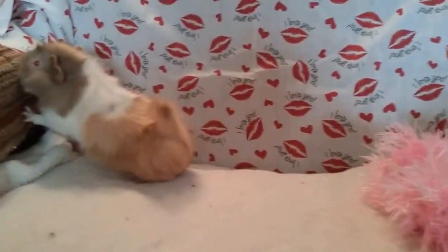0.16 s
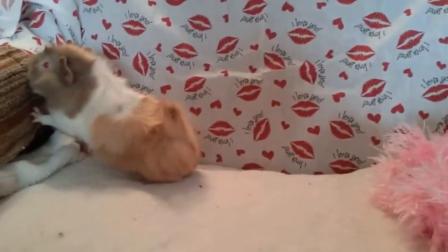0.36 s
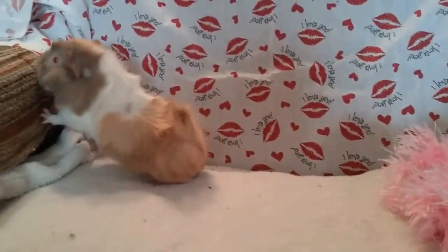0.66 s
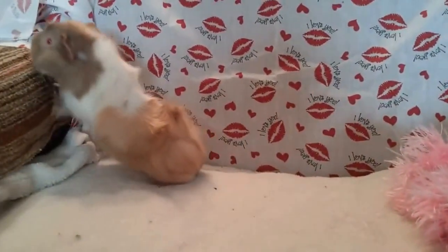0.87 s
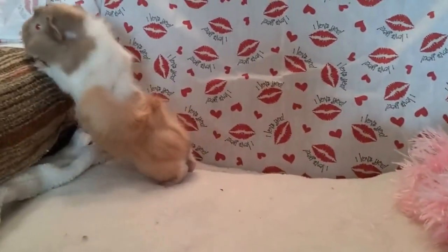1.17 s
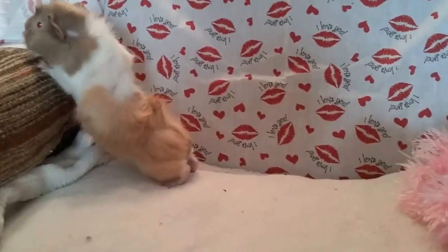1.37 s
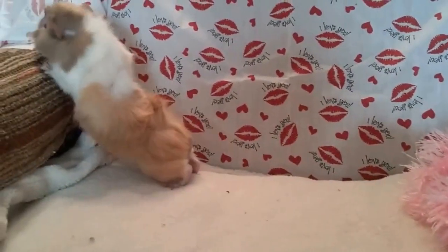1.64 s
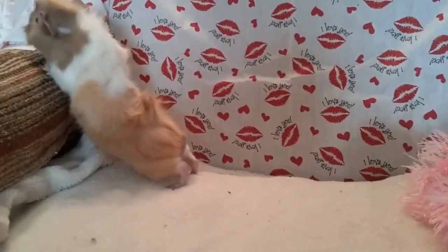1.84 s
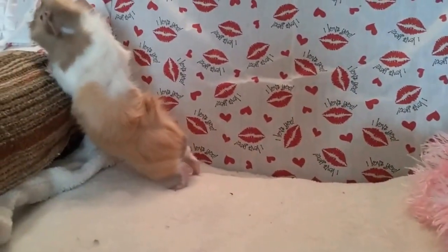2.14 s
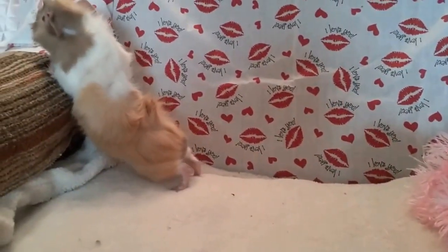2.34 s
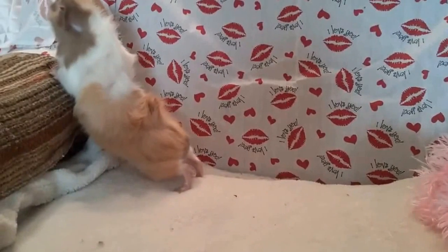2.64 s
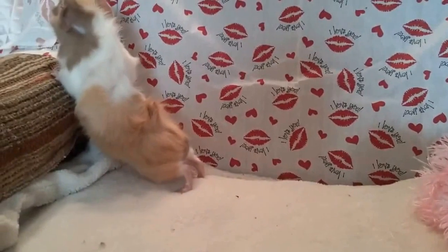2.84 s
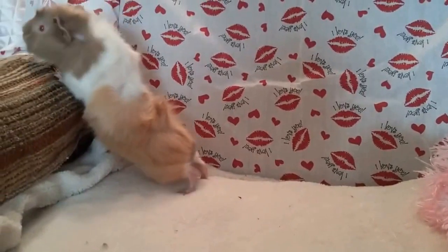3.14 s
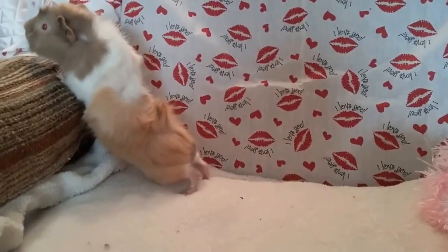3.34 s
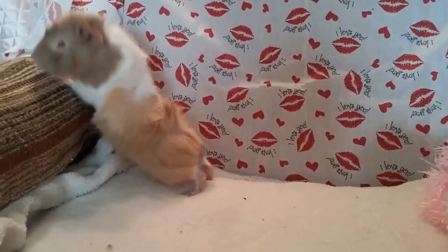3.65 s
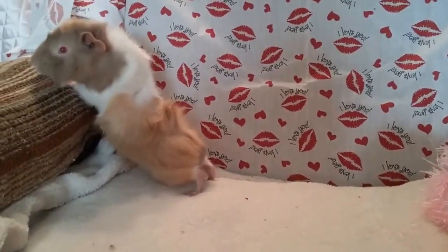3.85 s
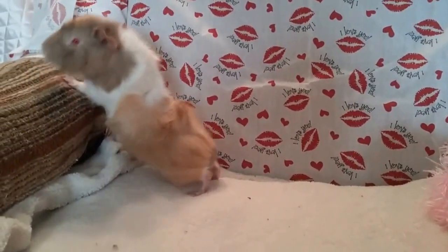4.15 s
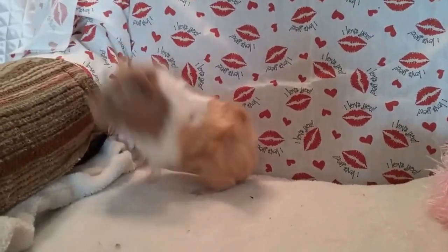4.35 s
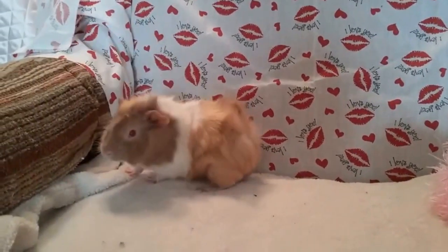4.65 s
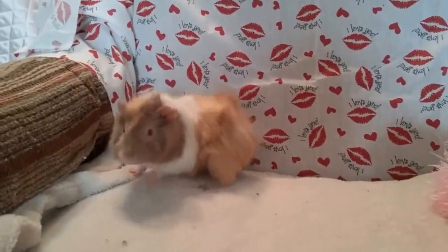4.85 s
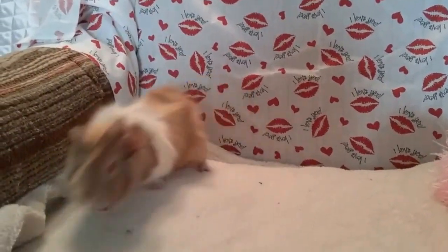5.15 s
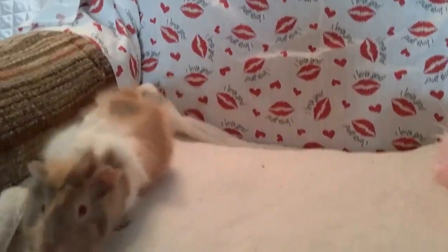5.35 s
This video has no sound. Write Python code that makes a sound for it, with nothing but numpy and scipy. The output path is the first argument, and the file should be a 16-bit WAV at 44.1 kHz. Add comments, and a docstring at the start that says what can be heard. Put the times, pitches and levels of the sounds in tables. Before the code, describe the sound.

Close to the microphone in a small room, a guinea pig calls about three times a second, its quiet, husky grunts often sliding up into loud, high whistles. A young goat, slightly farther off, bleats over it with a throaty quaver: one short call, two longer loud ones, then a faint one. Near the end the guinea pig thumps softly onto a blanket and keeps squealing. A few claw ticks and a low hum lie underneath.

```python
"""A small room, a guinea pig begging up close: husky grunts that glide up into whistles.
Every call follows one S-shaped climb in pitch; the short ones stop before the whistle.
A young goat bleats over it, a throaty buzz quavering at about ten beats a second.
The guinea pig drops onto its blanket and patters off with soft thumps.
A few ticks of claws and teeth, room air and a low hum lie underneath."""
import sys
import numpy as np
from scipy import signal
from scipy.fft import rfft, irfft
from scipy.io import wavfile
from scipy.ndimage import uniform_filter1d

SR = 44100
rng = np.random.default_rng(int(sys.argv[2]) if len(sys.argv) > 2 else 0)


def inscribe(sig):
    """Save sig as 16-bit PCM at rate SR to the path in sys.argv[1].

    A 1-D sig is mono; a 2-D sig holds one channel per row.
    Samples are clipped to [-1, 1] before scaling.
    """
    pcm = np.round(np.clip(np.atleast_2d(sig).T, -1, 1) * 32767)
    wavfile.write(sys.argv[1], SR, pcm.astype(np.int16))


N = 242991
T = np.arange(N) / SR
TOP_HZ = 15900

# colour of the guinea pig's hiss and rasp: f/Hz, gain/dB
BREATH_COLOUR = [(1200, -33.5), (2200, -2), (3300, -13.5), (4200, -13.5), (6200, 3.5), (8000, -7),
                 (11500, -9), (14000, -12), (16000, -53.5)]


def undb(db):
    """Decibels to gain."""
    return 10 ** (np.asarray(db) / 20)


def unit(x):
    """Scale to rms 1."""
    return x / np.sqrt(np.mean(x ** 2))


def walk(rate, size):
    """Random wander of rms 1, with `rate` turns a second."""
    return unit(np.interp(np.arange(size) * rate / SR, np.arange(size), rng.standard_normal(size)))


def gain_at(points, hz):
    """Gain of an EQ curve (f/Hz, gain/dB) at given frequencies."""
    f, db = np.transpose(points)
    return undb(np.interp(np.log(hz + 1), np.log(f), db))


def coloured(points):
    """Noise of rms 1 shaped by an EQ curve."""
    return unit(irfft(rfft(rng.standard_normal(N)) * gain_at(points, np.fft.rfftfreq(N, 1 / SR)), N))


def band(hz, width_hz):
    """Noise of rms 1 in one damped resonance with steep skirts."""
    f = np.fft.rfftfreq(N, 1 / SR) + 1
    return unit(irfft(rfft(rng.standard_normal(N)) / (1 + ((f - hz ** 2 / f) / width_hz) ** 2), N))


def swell(centre, length):
    """A smooth bump of an envelope."""
    return np.cos(np.pi * np.clip((T - centre) / length, -.5, .5)) ** 2


def partials(hz, throat, count):
    """Phases and throat gains of the harmonics of a moving pitch, one row each."""
    k = np.arange(1, count + 1)[:, None]
    return k * 2 * np.pi * np.cumsum(hz) / SR, gain_at(throat, k * hz) * (k * hz < TOP_HZ)


def call_shape(start, middle, end, held, grunt_hz, whistle_hz, glide,
               grunt_db, whistle_db, grunt_over_db, whistle_over_db):
    """Span, pitch, level and overtone level of a call, all riding one S-shaped climb."""
    # the voice thins where grunt breaks into whistle: climb/0-1, level/dB, overtones/dB
    thinning = [(0, -9, 1.5), (.22, 1, 0), (.6, -4.5, -2.5), (.85, -3.5, -5.5), (1, -2.5, -2.5)]
    creep_octaves_per_s, flick_share, flick_s = 1.6, .2, .017
    early_share, catch_s = .4216, .0054
    release_db, release_s = -11, .013885
    on = (T > start) & (T < end)
    t = T[on]
    climb = 1 / (1 + np.exp((middle - t) / glide))
    high = climb ** 6
    top_hz = whistle_hz * 2 ** (creep_octaves_per_s * (t - end))
    flick = flick_share * high * np.clip(2 * (1 - (end - t) / flick_s), 0, 1)  # whistles end upward
    hz = grunt_hz * (top_hz / grunt_hz) ** climb * (1 + flick + .008 * walk(45, N)[on])
    # the whistle swells partway during the climb, then catches all at once
    caught = 1 / (1 + np.exp((end - held - t) / catch_s))
    whistle = early_share * high + (1 - early_share) * caught * climb
    release = np.clip(1 - (end - t) / release_s, 0, 1)
    share, thin_db, thin_over_db = np.transpose(thinning)
    db = grunt_db + (whistle_db - grunt_db) * whistle
    db += np.interp(climb, share, thin_db) + release_db * release
    broken = np.clip((climb - .2663) / .65, 0, 1)  # crossfade from grunt colour to whistle colour
    over_db = grunt_over_db + (whistle_over_db - grunt_over_db) * broken
    over_db += np.interp(climb, share, thin_over_db)
    return on, hz, db, over_db


def wheek(call, grunt_jitter=.0564, whistle_jitter=.00911, slack_hz=720, open_hz=2150, flutter=.5407,
          shimmer_db=2.7332, husk_db=-6, air_db=-28, push_db=2.5, push_s=.032, fade_s=.0063):
    """One call: an uneven grunt that steadies and opens as it climbs into a whistle."""
    # throat EQ, mouth open for the whistle and closed for the grunt: f/Hz, gain/dB
    open_throat = [(1700, 10.5), (2400, 2.5), (3200, -47.5), (4400, -21.5), (5800, 3), (7000, -16),
                   (9000, -22), (12000, -20.5), (14500, 3), (16000, -7.5)]
    closed_throat = [(250, -24), (500, -4), (900, 1), (1700, 0), (2400, -4), (3100, -18), (4300, -20),
                     (5800, -34), (9000, -36), (15000, -46)]
    on, hz, db, over_db = call_shape(*call)
    t = T[on]
    db = db + push_db * np.exp((t[0] - t) / push_s)  # each call starts with a push
    slack = 1 / (1 + (hz / slack_hz) ** 4)  # slack folds beat unevenly
    closed = 1 / (1 + (hz / open_hz) ** 4)
    hz = hz * (1 + (whistle_jitter + grunt_jitter * slack) * walk(600, len(t)))
    phase, open_gain = partials(hz, open_throat, count=9)
    _, closed_gain = partials(hz, closed_throat, count=9)
    gain = closed_gain ** closed * open_gain ** (1 - closed)
    # overtones weaken with their order and come and go one by one
    upper = np.array([g / k ** .7 * undb(3.5 * walk(70, len(t))) for k, g in enumerate(gain[1:], 2)])
    overtones = (upper * np.sin(phase[1:])).sum(0) / np.sqrt((upper ** 2).sum(0))
    tone = np.sqrt(2) * (np.sin(phase[0]) + undb(over_db) * overtones)
    tone *= 1 + flutter * slack * walk(500, len(t))
    leak = 1 + np.cos(phase[0])  # air escapes once a cycle
    husk = undb(husk_db) * np.sqrt(slack) * leak * coloured(closed_throat)[on]
    air = undb(air_db + over_db) * coloured(BREATH_COLOUR)[on]  # a pressed call hisses
    edges = np.clip(np.minimum(t - t[0], t[-1] - t) / fade_s, 0, 1)
    shimmer = shimmer_db * (1 - slack) * walk(200.7, len(t))
    out = np.zeros(N)
    out[on] = (tone + husk + air) * edges * undb(db + shimmer)
    return out


def guinea_pig():
    """A string of begging calls, with a rasp where a whistle cracks."""
    # calls: start/s, mid-climb/s, end/s, whistle hold/s, grunt f/Hz, whistle f/Hz, glide/s,
    # grunt level/dB, whistle level/dB, grunt overtones/dB, whistle overtones/dB
    calls = [(-.2, -0.101, .012, 0.0497, 550.8, 2635, 0.0347, -23, -24, 0, -15),
             (0.106, 0.231, .238, 0.0156, 506, 2416, 0.028363, -45.5, -55, -3.5, 11),
             (0.434, 0.552, .555, 0, 487, 2504, 0.02767, -44.5, -47, -2, 0),
             (0.753, .879, .995, 0.0018, 487.3, 3173, 0.033, -42, -31.5, -3, -17),
             (1.103, 1.241, 1.254, 0.05686, 522.3, 2516, 0.0409, -43.5, -56, -4.5, 3),
             (1.398, 1.498, 1.498, 0, 521, 2579, 0.02207, -46.5, -56.5, -4.5, -26),
             (1.63, 1.761, 1.922, 0.0793, 531.6, 2990, .028, -46.5, -21.5, -1.5, -8),
             (2.03, 2.109, 2.255, 0.1334, 466.6, 2590, 0.015799, -39, -26.5, 3, -8.5),
             (2.36, 2.461, 2.485, 0.0076, 508.2, 2581, 0.02286, -42.5, -50.5, 0.5, 8.5),
             (2.577, 2.676, 2.85, 0.10378, 527.5, 3135, .025, -40.5, -16, 5, -3),
             (2.96, 3.066, 3.203, 0.09395, 516.9, 2941, 0.032206, -41, -25, 3, -2),
             (3.31, 3.445, 3.465, 0, 489.3, 2465, 0.04215, -44, -63.5, 6, 3),
             (3.658, 3.759, 3.785, 0.0257, 494, 2428, 0.03, -44.5, -47.5, 5.5, -3.5),
             (3.96, 4.058, 4.065, 0.0079, 519.9, 2523, 0.0313, -42, -68.5, 6.5, -12.5),
             (4.185, 4.321, 4.397, 0.0834, 521.4, 3083, 0.024965, -42.5, -44.5, 1.5, -12.5),
             (4.448, 4.564, 4.764, 0.0798, 513.2, 3044, 0.028358, -39.5, -21.5, -4, 3.5),
             (4.9, 5.02, 5.163, 0.08519, 516.3, 2945, 0.026235, -42, -30, -0.5, 7.5),
             (5.248, 5.352, 5.508, 0.12155, 401.9, 2781, 0.024764, -37.5, -22, 1, 2.5)]
    # cracks in the whistle: t/s, length/s, level/dB
    cracks = [(1.93, 0.04363, -41.5), (2.847, 0.01205, -39), (3.165, 0.0588, -38), (4.728, 0.0489, -38.5),
              (4.76, 0.01806, -45.5), (5.466, 0.0345, -19)]
    rasp = sum(undb(db) * swell(s, length) for s, length, db in cracks)
    return sum(wheek(call) for call in calls) + rasp * coloured(BREATH_COLOUR)


def room_tone(air_db=-51, hum_db=-57, hum_hz=172):
    """A bed of still air and a wavering hum."""
    # colour of the room's air: f/Hz, gain/dB
    air_colour = [(20, -44), (40, -46.5), (65, -1), (85, -4.5), (114, -14.5), (170, -2), (210, -9.5),
                  (360, -8.5), (470, -19), (770, -26), (2550, -33.5), (5000, -43), (15500, -35)]
    phase = 2 * np.pi * np.cumsum(hum_hz + 4 * walk(14, N)) / SR
    hum = np.sqrt(2) * np.sin(phase) * undb(2 * walk(9, N))
    air = coloured(air_colour) * undb(.8 * walk(6, N))
    return undb(air_db) * air + undb(hum_db) * hum


def ticks(attack_s=.0004484):
    """Claws and teeth: dry bursts of band noise with a sharp attack and an exponential fade."""
    # small contacts: t/s, level/dB, f/Hz, width/Hz, decay/s
    contacts = [(.315, -41.5, 1741, 1777, 0.004124), (0.496, -29, 2760, 928.5, 0.002138),
                (0.976, -40, 3296, 1529, 0.014994), (1.281, -37.5, 2210, 496, 0.00077),
                (3.513, -39, 2978, 706, 0.02255), (4.564, -47.5, 3526, 5890, 0.01055),
                (4.817, -17, 4417, 14600, 0.000185)]
    out = np.zeros(N)
    for s, db, hz, width, decay in contacts:
        envelope = np.exp(-np.maximum((s - T) / attack_s, (T - s) / decay))
        out += undb(db) * envelope * band(hz, width)
    return out


def bleat_shape(beats, bow, least_rough, depth, flank_s=.026, lead_s=.05, tail_s=.06433, edge_db=-22):
    """Span, pitch, level and roughness of a bleat: each beat swells, then sags and turns hoarse."""
    # one beat of the quaver: t from its centre/s, pitch ratio, level/dB, roughness/0-1
    quaver = [(-.039, .98, -14, .7), (-.024, 1, -4.5, .2), (-.01, 1, -1, .05), (.002, 1, 0, .05),
              (.015, .995, -1, .12), (.029, .94, -7.5, .55), (.045, .82, -13, .9)]
    knots = []
    for s, hz, db, glide in beats:
        for dt, ratio, dip, rough in quaver:
            bend = 1 + bow * min((dt / flank_s) ** 2, 1)
            pitch = hz * ratio ** depth * 2 ** (glide * dt) * bend
            knots.append((s + dt, pitch, db + dip * depth, max(rough, least_rough)))
    first, last = knots[0], knots[-1]
    knots.append((first[0] - lead_s, first[1] * .85, first[2] + edge_db, first[3]))  # scoop in
    knots.append((last[0] + tail_s, last[1], last[2] + edge_db, last[3]))  # trail off
    times, *curves = np.transpose(sorted(knots))
    on = (T > times[0]) & (T < times[-1])
    hz, db, rough = (uniform_filter1d(np.interp(T[on], times, c), size=300) for c in curves)
    return on, hz, db, rough


def bleat(beats, throat, manner, jitter=.038804, waver=.00503, hoarse_db=-1, shimmer_db=3, fade_s=.0037):
    """A bright buzz through the throat, hoarse where pitch and pressure sag."""
    bow, least_rough, depth, tilt = manner
    on, hz, db, rough = bleat_shape(beats, bow, least_rough, depth)
    t = T[on]
    hz = hz * (1 + waver * walk(119.12, len(t)) + jitter * rough * walk(700, len(t)))
    phase, gain = partials(hz, throat, count=28)
    gain *= undb(tilt * np.log2(np.arange(1, len(gain) + 1))[:, None])  # a wider mouth is brighter
    gain *= np.array([undb(2.5 * walk(35, len(t))) for _ in gain])
    spread = rng.uniform(0, np.pi, (len(gain), 1))  # the throat delays each harmonic differently
    buzz = unit((gain * np.sin(phase + spread)).sum(0))
    buzz *= undb(shimmer_db * rough * walk(300, len(t)))
    hiss = np.diff(coloured(throat)[on], prepend=0) + .54 * coloured(throat)[on]  # treble lifted
    air = unit(hiss) * (1 + np.cos(phase[0]) / 2)
    out = np.zeros(N)
    out[on] = (buzz + undb(hoarse_db) * rough * air) * undb(db) * np.minimum((t - t[0]) / fade_s, 1)
    return out


def goat():
    """Four bleats, each with its own mouth shape and delivery."""
    # beats, one list a bleat: t/s, f/Hz, relative level/dB, glide/(octaves per s)
    beats = [
        [(.579, 625.9, -26, -0.9725), (.687, 628.3, -19.5, 0.0644), (.775, 606.2, -35, 0.6478)],
        [(2.19, 668.2, -21.5, -0.3664), (2.285, 650, -15.5, -0.7214), (2.39, 674, -17, 0.488),
         (2.492, 684.4, -18, -0.6104), (2.595, 667, -19, 0.00048), (2.695, 668.5, -18.5, 0)],
        [(3.653, 588.5, -17, -0.1691), (3.744, 590.1, -15, -0.0646), (3.84, 588.3, -16.5, -0.3864),
         (3.941, 600.7, -16.5, -0.1983), (4.04, 607.2, -19, 0.3447)],
        [(5.13, 639.4, -35, 0), (5.218, 608.8, -30.5, 0.02496)],
    ]
    # throat and mouth EQ, one list a bleat: f/Hz, gain/dB
    throats = [
        [(350, -35.5), (620, -4), (900, -3.5), (1150, -3.5), (1300, 5), (1800, -7.5), (2450, -6), (3050, -7),
         (4000, -19.5), (5550, -3), (6200, -16), (7500, -8.5), (9000, -17), (12000, -21.5), (15500, -47.5)],
        [(400, -50.5), (660, -15.5), (940, -79.5), (1330, -2.5), (1980, -1), (2300, -16), (2650, -9),
         (3400, -6), (4020, -1.5), (4600, -9.5), (5700, -2), (8000, -12.5), (9100, -23), (15500, -28.5)],
        [(400, -19.5), (590, -26.5), (900, -42.5), (1200, -13), (1780, 1.5), (2050, -25.5), (2350, -10),
         (2930, -14), (3560, -4.5), (4400, -14.5), (5500, -6.5), (8100, -16), (9500, -24.5), (15500, -33)],
        [(350, -29.5), (620, 4), (880, -13.5), (1240, 8.5), (2100, -3.5), (3060, 2), (4020, -11.5),
         (5750, -3.5), (15500, -35.5)],
    ]
    # delivery: pitch bow at a beat's flanks/share, least roughness/0-1, quaver depth, tilt/(dB per octave)
    manners = [(-.08, .05, 1.45, 1), (-0.0093, 0.28, 1.05, 1.8833), (.026, 0.16, .92, 1.1334),
               (0.028, 0.56, 0.77, 5.5)]
    return sum(bleat(*parts) for parts in zip(beats, throats, manners))


def blanket_thumps():
    """Paws and body land on the blanket: soft swells of low noise."""
    # landings: t/s, length/s, level/dB, f/Hz
    landings = [(4.218, 0.0848, -35, 178), (4.272, 0.1548, -44, 165.7), (4.58, 0.07808, -30.5, 526),
                (4.607, 0.11494, -39, 206.2), (4.635, 0.2355, -36.5, 96.12), (5.387, 0.11866, -35, 171.3),
                (5.482, 0.1578, -47, 158.8)]
    return sum(undb(db) * swell(s, length) * band(hz, 1.107 * hz) for s, length, db, hz in landings)


def room(x, wet_db, t60, treble_t60, predelay_s=.003, split_hz=5000):
    """Direct sound plus dense reflections whose treble dies sooner."""
    t = T[:SR // 2]
    noise = rng.standard_normal(len(t))
    low = signal.sosfilt(signal.butter(1, split_hz, fs=SR, output="sos"), noise)
    tail = (low * 1000 ** (-t / t60) + (noise - low) * 1000 ** (-t / treble_t60)) * (t > predelay_s)
    return x + undb(wet_db) * signal.fftconvolve(x, tail / np.sqrt(np.sum(tail ** 2)))[:N]


def scene():
    """A mono mix of both animals in the room, the guinea pig nearer and drier."""
    near = room(guinea_pig(), wet_db=-10.5, t60=.23415, treble_t60=.08892)
    far = room(goat(), wet_db=-8.2, t60=.23357, treble_t60=.13045)
    return (near + undb(-.1133) * far + blanket_thumps() + ticks() + room_tone())[None]


def record(dry):
    """A steep low-pass takes off the very top."""
    return signal.sosfilt(signal.ellip(10, .2, 80, TOP_HZ, fs=SR, output="sos"), dry)


dry = scene()
out = record(dry)
inscribe(out)
```